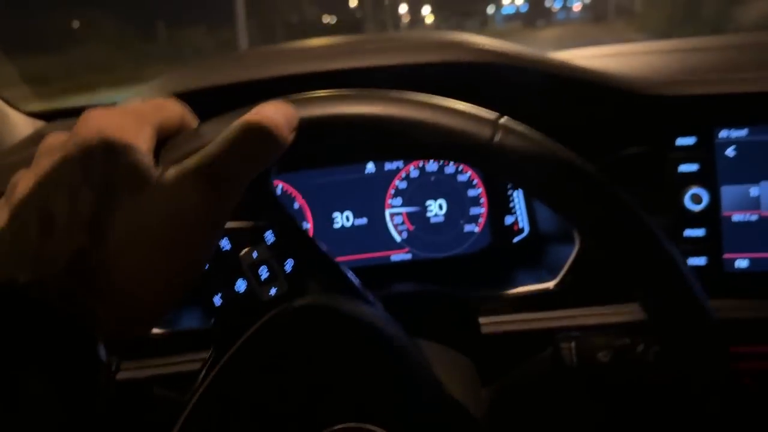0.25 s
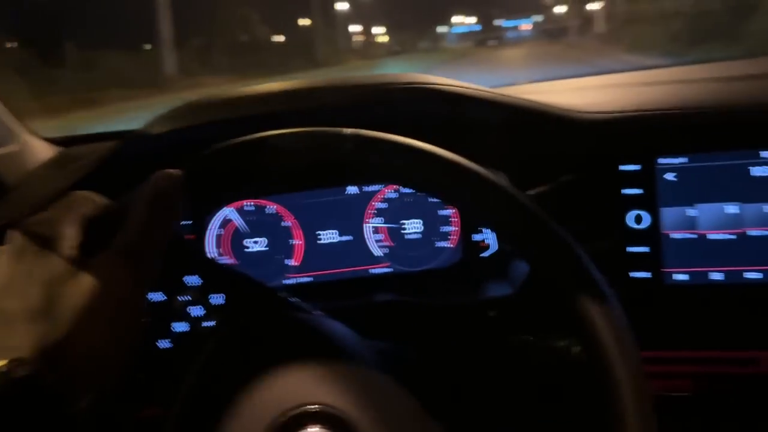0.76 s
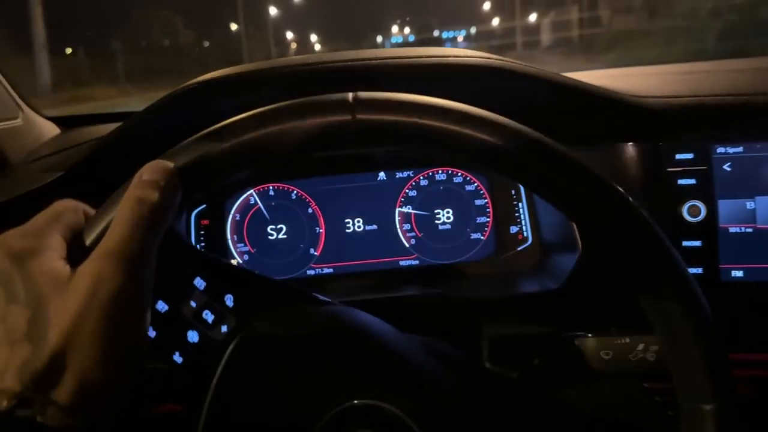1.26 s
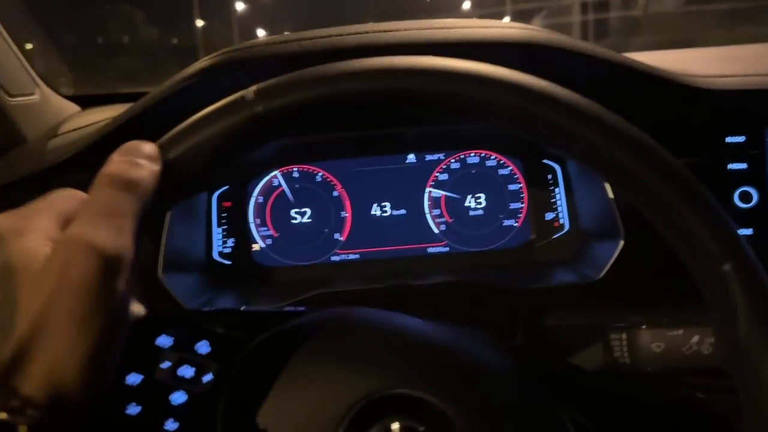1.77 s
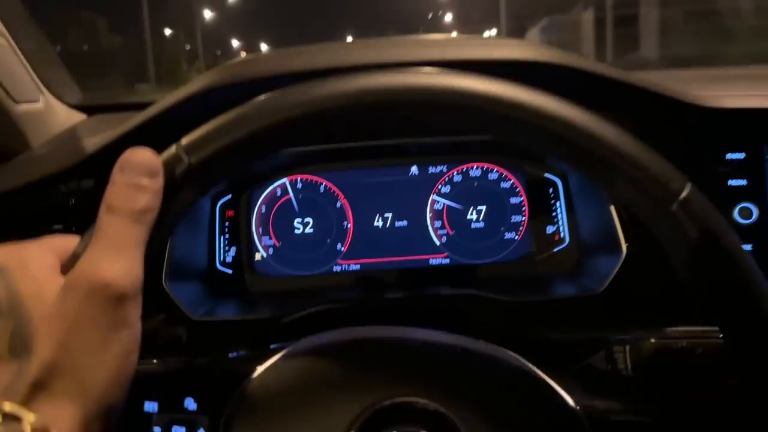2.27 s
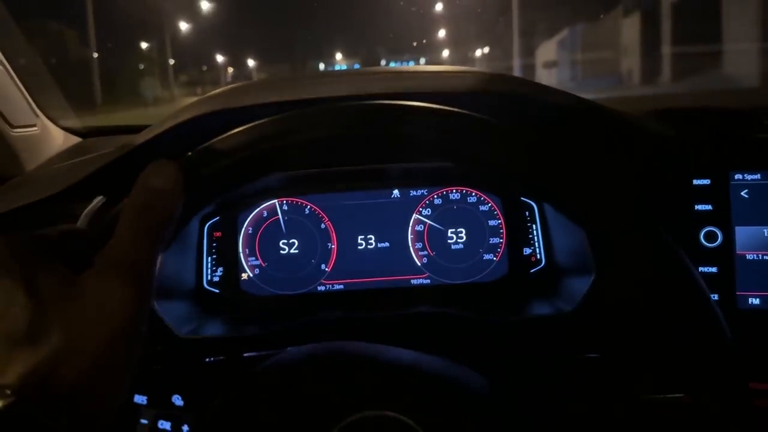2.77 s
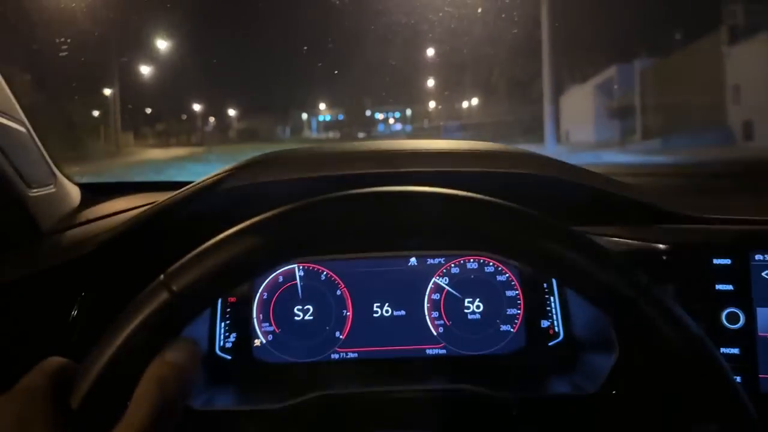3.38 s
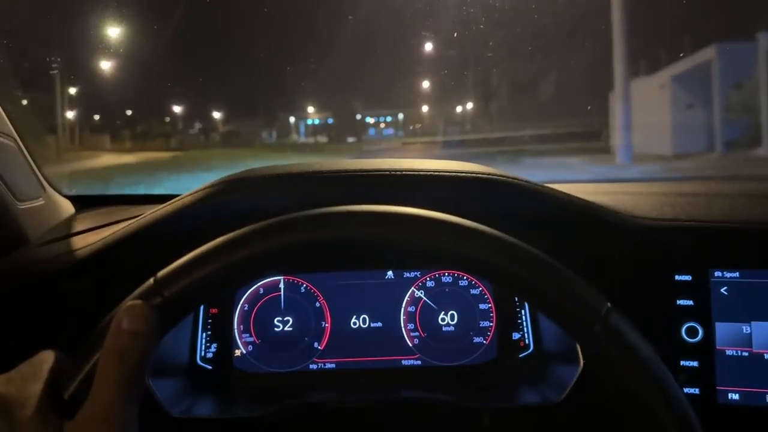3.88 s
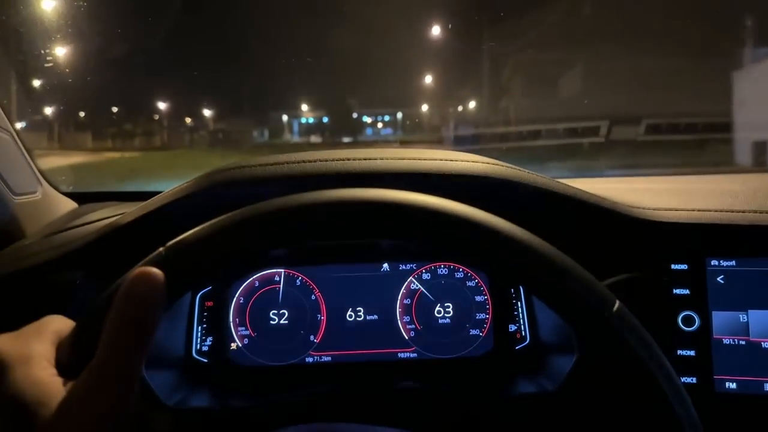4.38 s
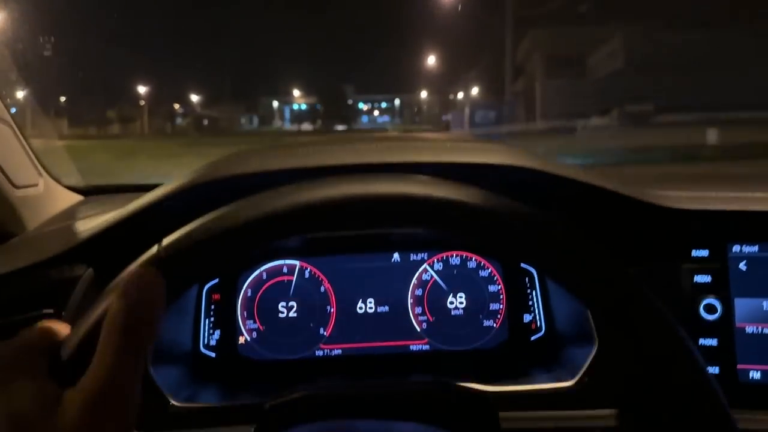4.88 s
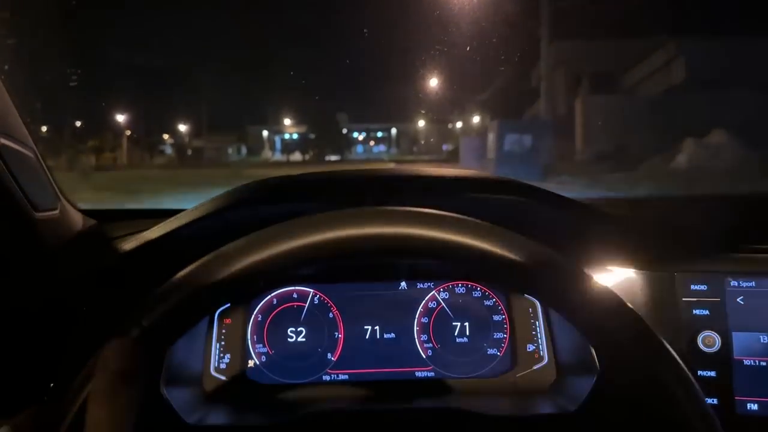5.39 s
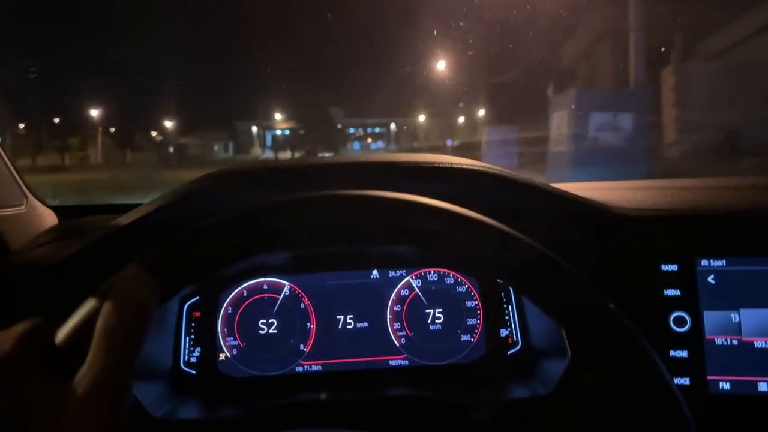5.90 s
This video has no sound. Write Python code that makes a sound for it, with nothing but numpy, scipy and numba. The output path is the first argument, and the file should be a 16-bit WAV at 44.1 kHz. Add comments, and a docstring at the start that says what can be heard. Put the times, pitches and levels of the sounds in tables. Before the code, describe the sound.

A hard second-gear acceleration heard from the driver's seat: boomy exhaust growl rising in pitch, with valve clatter, trim resonance, airy hiss and low bumps.

```python
"""Hard pull in second gear

A four-cylinder car with an open exhaust accelerates, heard on a phone in the driver's seat. Firing pulses
ring the cabin's air and panel modes, which each microphone hears with its own strength and sign. Crank-locked
clatter mixed with noise makes the gas roar, and trim rings along with it. Valve knock rings the cylinder head;
shaped noise makes the intake air hiss and the road rumble, which swells over bumps."""
import sys
import numpy as np
from scipy import signal
from scipy.fft import rfft, irfft, next_fast_len
from scipy.io import wavfile
from scipy.ndimage import uniform_filter1d, map_coordinates
from numba import njit

SR = 44100
rng = np.random.default_rng(int(sys.argv[2]) if len(sys.argv) > 2 else 0)


def dump(signal):
    """Clip the signal to [-1, 1] and save it as 16-bit WAV at the path in sys.argv[1]."""
    limited = np.clip(np.atleast_2d(signal).T, -1, 1)
    pcm = np.round(limited * 32767).astype(np.int16)
    wavfile.write(sys.argv[1], SR, pcm)


N = 271082


def undb(db):
    """Decibels to amplitude gain."""
    return 10 ** (np.asarray(db) / 20)


def curves(table):
    """Columns of a time table, interpolated to one value per sample."""
    time_s, *columns = np.transpose(table)
    return [np.interp(np.arange(N) / SR, time_s, c) for c in columns]


def unit(x):
    """Scale to rms 1."""
    return x / np.sqrt(np.mean(x ** 2))


def walk(rate_hz):
    """Random levels held 1 / rate_hz s and smoothed twice; rms 1."""
    hold = int(SR / rate_hz)
    steps = np.repeat(rng.standard_normal(N // hold + 1), hold)
    smooth = uniform_filter1d(uniform_filter1d(steps, hold), hold)
    return unit(smooth[:N])


def below(x, hz):
    """The part of x under hz, without delay."""
    return signal.sosfiltfilt(signal.butter(4, hz, fs=SR, output="sos"), x)


@njit
def bandpass(x, hz, width_hz):
    """State-variable resonator, gain 1 at the centre."""
    y, band, low = np.empty(len(x)), 0., 0.
    g, damping = np.tan(np.pi * hz / SR), width_hz / hz
    for i in range(len(x)):
        v = (band + g * (x[i] - low)) / (1 + g * (g + damping))
        band = 2 * v - band
        low += 2 * g * v
        y[i] = damping * v
    return y


def ring(x, modes, count=1):
    """Parallel modes with signed gains at two microphones; count resonators in series per mode."""
    out = 0
    for hz, width_hz, left, right in modes:
        y = x
        for _ in range(count):
            y = bandpass(y, float(hz), float(width_hz))
        out = out + np.outer([left, right], y)
    return out


# how the two microphones hear the roar: pitch_hz, likeness (0-1), left_lead_rad, left_minus_right_db
MIC_PORTS = [(20, .995, 0, 0), (90, .99, .05, .5), (200, .9, .2, 1), (520, .55, .2, 1), (780, .45, -3.9, 0),
             (1290, .4, -3.7, -1), (1700, .35, -2, -5), (2580, .7, .3, -3), (3100, .35, 3.1, -2),
             (4570, .5, 7.5, 0), (5200, .2, 10, 2), (6030, .4, 13.3, 4), (7410, .5, 15, 5),
             (7800, .2, 17, 3), (8300, .72, 18.85, 0), (10200, .78, 16.6, 0), (10500, .99, 15.75, 0),
             (11700, .99, 15.65, 0), (12800, .45, 13.6, 0), (13900, 1, 12.57, 0), (15800, .9, 12.5, 0)]


def roar(spectrum, flicker_db, rate_hz, source, bands_per_octave=3):
    """Stereo noise: shared source plus each microphone's own, in bands that flicker independently."""
    size = next_fast_len(N)
    hz = np.fft.rfftfreq(size, 1 / SR) + 0.00083  # offset avoids log(0)
    f, density_db = np.transpose(spectrum)
    octave = np.log2(hz)
    shape = undb(np.interp(np.log(hz), np.log(f), density_db)) * (hz > f[0]) * (hz < f[-1])

    port_hz, *columns = np.transpose(MIC_PORTS)
    alike, lead_rad, pan_db = (np.interp(hz, port_hz, c) for c in columns)
    alike = np.clip(alike, 0, 1)
    sides = np.array([[.5], [-.5]])
    shared = rfft(source, size) * np.exp(1j * sides * lead_rad)
    own = rfft(rng.standard_normal((2, N)), size)
    pair = np.sqrt(alike) * shared + np.sqrt(1 - alike) * own
    pair = pair * shape * undb(sides * pan_db)

    out = 0
    step = 1 / bands_per_octave
    for centre in np.arange(np.log2(f[0]), np.log2(f[-1]) + step, step):
        edge = np.cos(np.pi / 2 * np.clip(bands_per_octave * (octave - centre), -1, 1))
        band = irfft(pair * edge ** 2, size)[:, :N]
        out = out + band * undb(flicker_db * walk(rate_hz))
    return unit(out)


# rumble spectrum: pitch_hz, relative_density_db (per Hz)
ROAD_SPECTRUM = [(18, -20.5), (30, -9.5), (45, -1), (60, -3), (90, -11.5), (140, -9.5), (200, -15.5),
                 (300, -32)]
# bumps: centre_s, swell_db, length_s (centre to 1/e of the swell)
ROAD_BUMPS = [(0.1, -2, 0.14), (0.36, 10.5, 0.15), (0.62, 8, 0.09), (1.56, 4, 0.05), (3.77, 4, 0.074),
              (4.201, 3, 0.17), (5.55, 3, 0.059)]
ROAD_DB = -32


def road():
    """Low noise through the floor; bumps change its level in bell-shaped bursts."""
    t = np.arange(N) / SR
    swell_db = sum(db * np.exp(-((t - s) / length_s) ** 2) for s, db, length_s in ROAD_BUMPS)
    return undb(ROAD_DB + swell_db) * roar(ROAD_SPECTRUM, 2.5, 6, rng.standard_normal(N))


# hiss spectrum: pitch_hz, relative_density_db (per Hz)
AIR_SPECTRUM = [(2200, -17.5), (3000, -1), (4500, -5), (7400, -6), (8300, -8), (10000, -13), (11000, -14),
                (12000, -22.5), (14000, -19.5), (15700, -26)]


def intake_air(puff):
    """Turbulent intake hiss, pulsing once a firing."""
    return puff * roar(AIR_SPECTRUM, 1.53, 21.96, rng.standard_normal(N), bands_per_octave=6)


CLATTER_TOP_HZ = 1730  # crank-locked part fades out above


def clatter(phase, count=128):
    """Valve and piston noise in patterns that repeat every firing, turn and full cycle, plus free noise."""
    firing, turn, cycle = rng.standard_normal((3, 2, 4 * count))
    each_firing = np.tile(firing[:, :count], 4)
    each_turn = np.tile(turn[:, :2 * count], 2)
    patterns = undb(-1.5) * each_firing + each_turn + undb(-13.0) * cycle
    crank = np.unwrap(phase, period=1) * count % (4 * count)
    a, b = (map_coordinates(p, [crank], order=3, mode="grid-wrap") for p in patterns)
    drift_rad = 0.54 * walk(1.89)  # slow pattern change: lines come and go
    locked = np.cos(drift_rad) * a + np.sin(drift_rad) * b
    free = rng.standard_normal(N)
    dull = signal.butter(2, CLATTER_TOP_HZ, fs=SR, output="sos")
    return unit(signal.sosfiltfilt(dull, 0.91 * locked - 0.7 * free) + 1.61 * free)


CABIN_T60_S = 0.043


def reflect(x):
    """Dense short tail off glass and dash: fixed fine spectral peaks and dips."""
    t = np.arange(SR // 8) / SR
    tail = rng.standard_normal(len(t)) * undb(-60 * t / CABIN_T60_S)
    tail[0] = undb(27.5)  # direct sound
    return unit(signal.fftconvolve(x, tail)[:N])


# gas roar spectrum: pitch_hz, relative_density_db (per Hz)
GAS_SPECTRUM = [(88, -40), (150, -11), (162, -20), (220, -15.5), (475, -19), (688, -31.5), (824, -23),
                (1370, -21.5), (1600, -26.5), (2300, -29.5), (2700, -35), (3300, -51)]


def gas_roar(phase, puff):
    """Reflected engine clatter shaped to the gas spectrum, pulsing once a firing."""
    return puff * roar(GAS_SPECTRUM, 1.96, 26, reflect(clatter(phase)), bands_per_octave=5)


# trim and pipe resonances: pitch_hz, width_hz, relative_level_db (before width weighting)
TRIM_MODES = [(737, 108, 4), (1368, 26, 2), (1918, 60, -4.5), (2542, 33, -3), (3600, 290, 0.5)]
# swell of the second and fourth resonance: time_s, lower_db, upper_db
TRIM_TONES = [(0, 5, -11), (1.0, -3, -9.5), (1.4, 7.5, -2.5), (1.9, 12.5, 12), (2.7, 5, 3.5),
              (3.4, -2, -7.5), (4.2, 4, -5), (4.6, -5.5, -11.5), (4.9, -1.5, 9), (5.3, -4, -3),
              (5.8, 1.5, 6.5), (6.15, 9.5, 2)]


def trim(gas):
    """Narrow resonances excited by the roar; they swell and fade."""
    out = 0
    lower_db, upper_db = curves(TRIM_TONES)
    for (hz, width_hz, db), swell_db in zip(TRIM_MODES, (0, lower_db, 0, upper_db, 0)):
        tone = unit(np.array([bandpass(g, float(hz), float(width_hz)) for g in gas]))
        level_db = db + swell_db + 1.0 * walk(9.5) + 0.26 * walk(0.63)
        out = out + undb(level_db) * np.sqrt(width_hz) * tone
    return unit(out)


# the second knock's lag widens up to 4.3 s, then mostly narrows; the last two columns play in exhaust():
# time_s, knock_db, second_knock_lag (firing gaps), unevenness (factor), upper_partials_db
VALVE_GEAR = [(0, -47, .005, 1.75, -4), (0.3, -37.5, 0.0073, 1.6, -18), (0.45, -45, .005, 0.63, -7.5),
              (0.75, -40, .005, 0.46, -0.5), (1.2, -36, .005, 0.35, -1.5), (1.6, -46, 0.006, .35, -1.5),
              (2.0, -38, 0.0066, 0.46, -1.5), (2.4, -46.5, 0.017, 1.3, -2.5), (2.8, -37, 0.033, 1.83, -2),
              (3.5, -41.5, 0.04, 3.2, 0), (3.9, -41.5, 0.08, 1.85, 1), (4.26, -44, 0.088, 1.4, -8),
              (4.34, -42, .095, .9, -2), (4.8, -38.5, 0.025, 1.1, -1.5), (5.2, -48, 0.023, 0.84, -2),
              (6.15, -45, 0.049, 0.61, 2)]
# head and bulkhead modes: pitch_hz, width_hz, left_gain, right_gain (signed, relative)
HEAD_MODES = [(700, 40, -0.3, -0.27), (965, 37, .6, -0.04), (747.9, 40, 1, 0.7), (849, 46, 0.12, -1.3),
              (919, 55, 0.26, .8), (1088, 49, 0.37, 0.44), (1195, 23, -0.65, -0.2), (1346, 68, 0.54, 0.37)]


def knock(phase):
    """Valve gear: two uneven clicks a turn ring the cylinder head and bulkhead."""
    level_db, lag = curves(VALVE_GEAR)[:2]
    crank = np.unwrap(phase, period=1)  # firings; two a turn
    clicks = sum(np.diff(np.floor(c / 2), prepend=0.) > 0 for c in (crank, crank - 1 - lag))
    struck = clicks * undb(1.9 * walk(60) + 2.8 * walk(5.1))
    return undb(level_db) * unit(ring(struck, HEAD_MODES, count=2))


# jolts that wind up the driveline: start_s, swing_hz (of firing rate, before damping)
DRIVELINE_JOLTS = [(1.999, 4.5), (2.321, 4), (3.241, -3), (4.22, 1.57), (4.699, 2)]
ROCK_HZ, ROCK_DECAY_S = 3.2, 0.26


def rocking():
    """Driveline spring: each jolt starts a damped swing of the firing rate."""
    start_s, swing_hz = np.transpose(DRIVELINE_JOLTS)
    since_s = np.maximum(np.arange(N) / SR - start_s[:, None], 0)
    return swing_hz @ (np.exp(-since_s / ROCK_DECAY_S) * np.sin(2 * np.pi * ROCK_HZ * since_s))


@njit
def fire(hz, corner_hz, rate_factor, size):
    """A pulse at each phase wrap, split over two samples, decaying at the corner rate; also the phase."""
    out, phase = np.empty(len(hz)), np.empty(len(hz))
    p, k, y, carry = 1., 0, 0., 0.
    for i in range(len(hz)):
        step = hz[i] * rate_factor[k] / SR
        p += step
        x, carry = carry, 0.
        if p >= 1:
            p, k = p - 1, k + 1
            x = size[k] * p / step / step / 2
            carry = size[k] * (1 - p / step) / step / 2
        # steady flow (.5) is not heard
        y += (1 - np.exp(-2 * np.pi * corner_hz[i] / SR)) * (x - .5 - y)
        out[i], phase[i] = y, p
    return out, phase


# revs flare as the throttle opens, hold while the clutch takes up, then climb with the car:
# time_s, firing_rate_hz (before rocking), pulse_db, pulse_corner_hz
ENGINE_RUN = [(0, 68.7, 3, 145), (0.12, 79.5, 8.5, 90), (0.25, 91.3, 4, 201), (0.35, 96.2, 12.5, 162),
              (0.5, 103.8, 12.5, 280), (0.72, 108.7, 10.5, 312), (1.1, 109.7, 10.5, 202),
              (1.6, 111.3, 8.5, 200), (2.0, 115.8, 6.5, 249.9), (2.6, 123.7, 4, 367), (3.1, 127.1, 4, 566),
              (3.6, 132.9, 3.5, 424), (4.1, 140.8, 2.5, 361.6), (4.25, 142, 1.9, 453),
              (4.4, 147.2, 4.5, 422), (4.7, 149.9, 3, 700.5), (5.2, 157.6, 5, 554.6),
              (5.6, 162.2, 4.5, 485), (6.15, 168.2, 0, 518.5)]
# in firing order, before the unevenness factor: strength_db
CYLINDER_STRENGTH = [0.19, 0.036, 0.26, 0.028]
# unequal manifold runners, in firing order, before the unevenness factor: rate_offset (share of firing rate)
CYLINDER_RATE = [.012, -.008, .008, -.012]
# cabin air and panel modes: pitch_hz, width_hz, left_gain, right_gain (signed)
CABIN_MODES = [(76, 26.8, -0.18, -0.14), (112.5, 23.4, -0.28, -0.22), (134.8, 38.5, 0.28, 0.27),
               (180, 158, 0.0043, 0.034), (183, 10, 0.1, -0.0033), (220.5, 16, -0.078, -0.035),
               (271.3, 57.7, 0.12, 0.058), (280.8, 23.8, -0.069, -0.14), (308.8, 21, 0.054, 0.024),
               (325.6, 22.6, 0.044, -0.073), (339.5, 54, -0.0012, 0.044), (388.7, 18, -0.0012, 0.034),
               (411.6, 84, -0.034, -0.05), (441, 35.4, 0.073, 0.07), (470.8, 43.6, -0.045, -0.065),
               (482.2, 17, 0.011, 0.034), (546, 44, -0.018, 0.0041), (640, 120, -0.0034, -0.009),
               (720, 15, -0.0028, 0.011), (489, 57, -0.026, 0.0061), (567, 33, 0.0085, 0.0095),
               (521, 31, 0.03, 0.022)]
# the note's lowest partials swell and dip briefly: centre_s, swell_db
LOW_SWELLS = [(3.69, -1.6), (3.79, 1.5), (3.88, -2), (3.97, 2), (4.27, -3), (4.36, -4), (4.53, -2),
              (4.58, 3), (4.65, 1), (4.74, 3)]
SWELL_S, SWELL_TOP_HZ = 0.031, 201
UPPER_HZ = 360  # upper partials start
SEATS_HZ = 630  # seats soak up the note above


def exhaust():
    """Nearly even firing pulses ring the cabin modes; also returns the firing phase."""
    hz, load_db, corner_hz = curves(ENGINE_RUN)
    rate_chance, size_chance = rng.standard_normal((N // 200, 2)).T
    uneven, upper_db = curves(VALVE_GEAR)[2:]
    uneven = np.interp(np.arange(len(rate_chance)), np.cumsum(hz) / SR, uneven)  # one per firing
    size_db = uneven * (np.resize(CYLINDER_STRENGTH, len(uneven)) + 0.12 * size_chance)
    rate_factor = 1 + uneven * np.resize(CYLINDER_RATE, len(uneven)) + 0.0021 * rate_chance
    pulses, phase = fire(hz + rocking(), corner_hz, rate_factor, undb(size_db))
    pulses = pulses * undb(load_db + 0.35 * walk(18))  # driveline shudder

    t = np.arange(N) / SR
    swell_db = sum(db * np.exp(-((t - s) / SWELL_S) ** 2) for s, db in LOW_SWELLS)
    note = ring(pulses, CABIN_MODES)
    lowest, to_middle, to_seats = (below(note, f) for f in (SWELL_TOP_HZ, UPPER_HZ, SEATS_HZ))
    top = undb(-4.5 + 3 * walk(7)) * (note - to_seats)  # highest partials come and go
    upper = to_seats - to_middle + top
    return undb(swell_db) * lowest + to_middle - lowest + undb(upper_db) * upper, phase


# noises swell as the throttle opens and sag as revs climb: time_s, low_roar_db, high_roar_db, air_hiss_db
NOISE_LEVELS = [(0, -35, -39, -45.5), (0.29, -29.5, -36.5, -45.5), (0.37, -25.5, -30, -40.5),
                (0.55, -24, -25, -36.5), (0.85, -24, -25.5, -36.5), (1.3, -29, -30, -40),
                (1.9, -31.5, -30.5, -37.5), (3.6, -32, -29.5, -37.5), (4.3, -32, -31, -39.5),
                (5.1, -35.5, -31.5, -40.5), (5.45, -33.5, -32.5, -42.5), (6.15, -34.5, -33.5, -41)]


def scene():
    """Exhaust note, valve knock, gas roar with trim, intake air and road."""
    low_db, high_db, air_db = curves(NOISE_LEVELS)
    note, phase = exhaust()
    puff = unit(1 + 0.068 * np.cos(2 * np.pi * phase))  # one gas puff a firing
    buffet = undb(0.7 * walk(27.955))  # gusts round the body flutter the noise treble together
    gas = gas_roar(phase, puff)
    gas = gas + undb(-5.5) * trim(gas)
    low = signal.sosfiltfilt(signal.butter(5, 1500, fs=SR, output="sos"), gas)
    engine = undb(low_db) * low + undb(high_db) * buffet * (gas - low)
    air = undb(air_db) * buffet * intake_air(puff)
    return note + knock(phase) + engine + air + road()


TOP_HZ = 15750


def record(dry):
    """Phone: soft limiting of the loudest peaks, then a steep low-pass."""
    knee, room = .7, .27  # full-scale amplitude
    over = np.maximum(np.abs(dry) - knee, 0)
    rounded = dry - np.sign(dry) * (over - room * np.tanh(over / room))
    return signal.sosfilt(signal.ellip(10, .2, 80, TOP_HZ, fs=SR, output="sos"), rounded)


dry = scene()
out = record(dry)
dump(out)
```